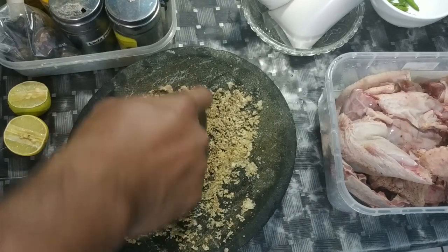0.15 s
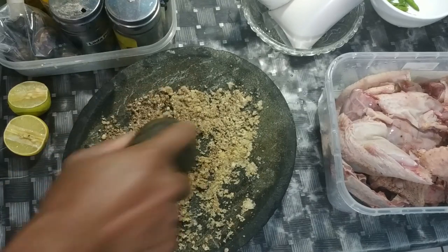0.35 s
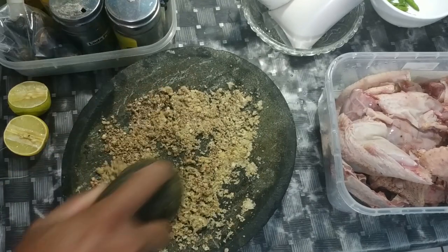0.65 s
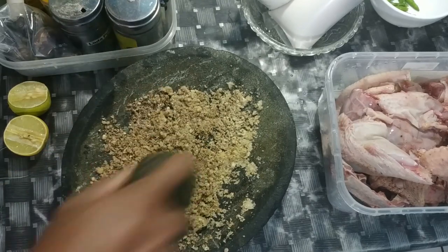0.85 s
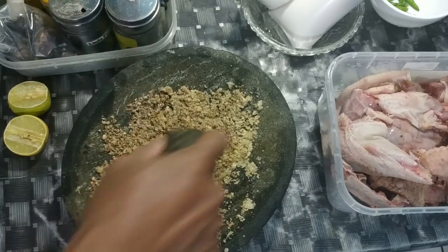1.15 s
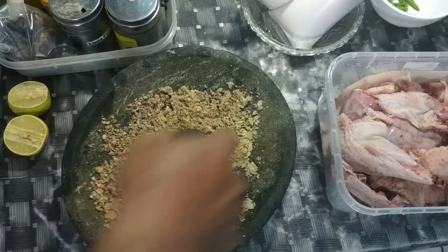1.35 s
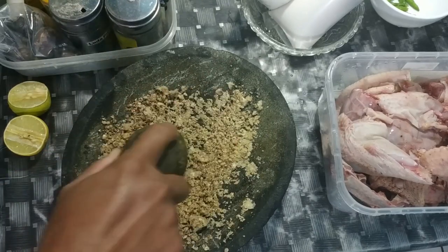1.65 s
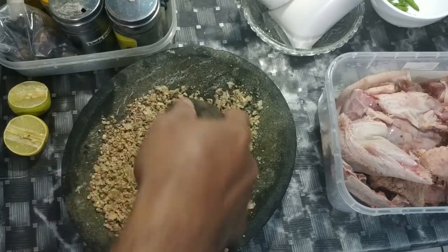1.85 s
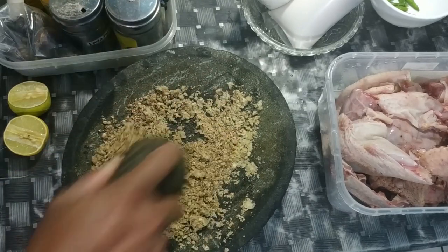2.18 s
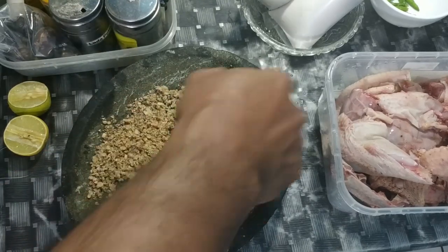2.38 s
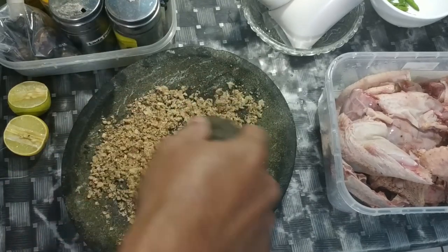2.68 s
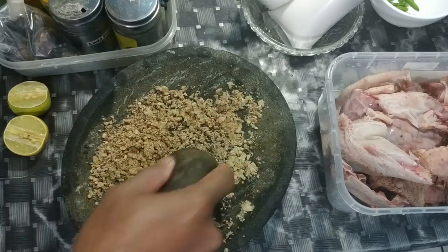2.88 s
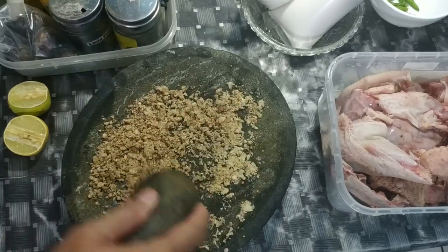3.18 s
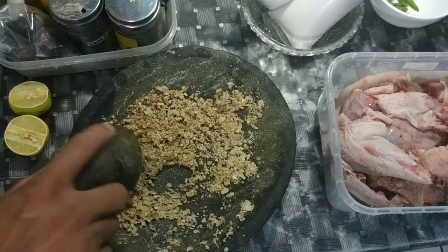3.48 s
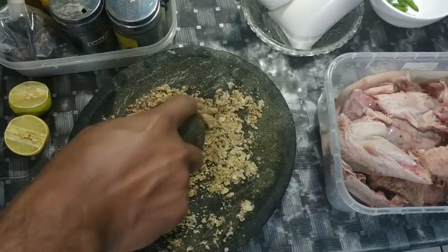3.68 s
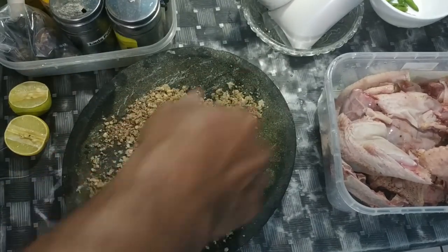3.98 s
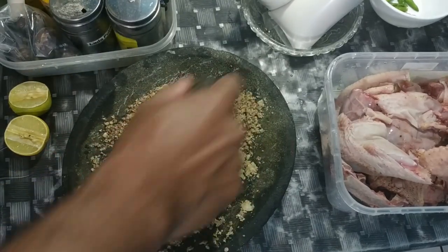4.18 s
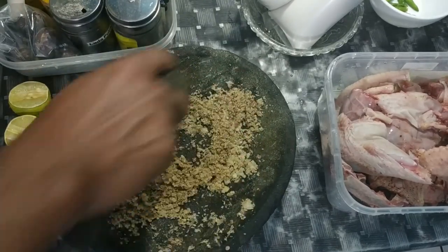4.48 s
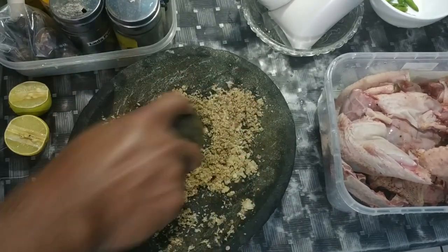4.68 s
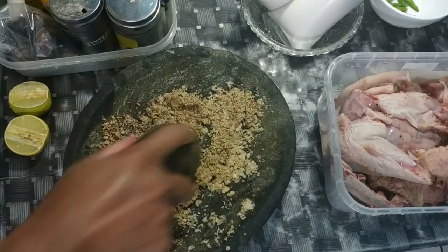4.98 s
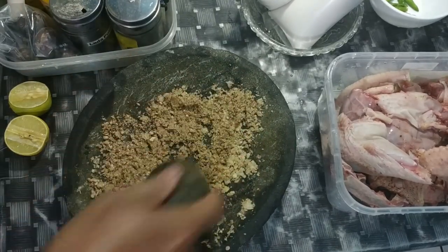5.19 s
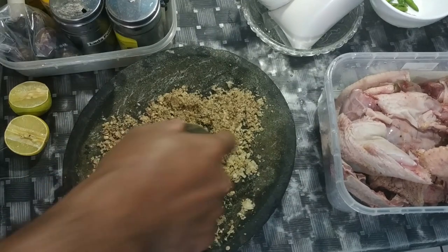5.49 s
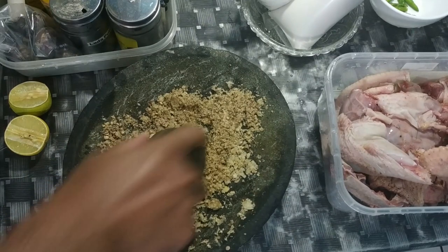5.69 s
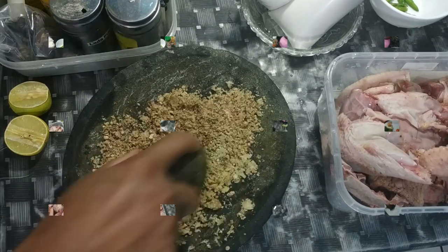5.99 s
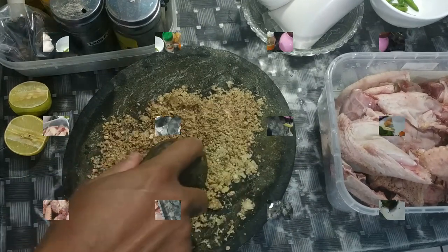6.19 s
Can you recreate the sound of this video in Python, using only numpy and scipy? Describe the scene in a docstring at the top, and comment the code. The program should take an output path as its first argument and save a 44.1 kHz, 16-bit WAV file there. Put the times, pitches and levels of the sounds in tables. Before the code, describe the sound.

A stone pestle grinds dry, hard spices on a stone mortar in gritty crunching strokes, with dull thumps and two loud stone clacks.

```python
"""On a kitchen table in a small, hard-walled room, a stone pestle crushes hard spices on a flat stone mortar.
Blows cushioned by spice thump and set the table ringing; bare stone clacks or skids and rings in decaying modes.
Random fractures merge to a hiss under each stroke; short bright bursts and faint narrow bands of noise add treble.
Behind them lie a steady rush of room air and a wavering hum; the recorder's limiter ducks the loudest knocks."""
import sys
import numpy as np
from scipy import signal
from scipy.fft import rfft, irfft
from scipy.io import wavfile
from scipy.ndimage import uniform_filter1d

SR = 44100
rng = np.random.default_rng(int(sys.argv[2]) if len(sys.argv) > 2 else 0)


def inscribe(sig):
    """Save sig as 16-bit PCM at rate SR to the path in sys.argv[1].

    A 1-D sig is mono; a 2-D sig holds one channel per row.
    Samples are clipped to [-1, 1] before scaling.
    """
    pcm = np.round(np.clip(np.atleast_2d(sig).T, -1, 1) * 32767)
    wavfile.write(sys.argv[1], SR, pcm.astype(np.int16))


N = 279990

# spectrum of a dull thud, for blows and the rumble of the drag: (frequency [Hz], relative level [dB])
THUD_SPECTRUM = [(30, -27), (70, -29.5), (110, -10.5), (150, -7), (185, 5.5), (260, 1.5), (360, 4),
                 (480, -3.5), (620, -7), (950, -4), (1500, -14.5), (4000, -4)]
# ringing modes of the stone mortar: (frequency [Hz], relative level [dB], t60 [s])
MORTAR_MODES = [(990, -27, .08), (1080, -30, 0.065), (1214, -11, 0.029), (1468, -16, 0.027),
                (1572, -19, 0.091), (1933, 13.5, 0.015), (2027, 8.5, 0.094), (2055, 2.5, 0.23),
                (2110, 10, 0.057), (2346, 13, 0.02)]


def thumps():
    """The pestle lands on spice and shoves the heavy mortar into the table, which rings."""
    # blows cushioned by spice:
    # (time [s], relative level [dB], brightness corner [Hz], time the seeds take to give way [s])
    blows = [(0.002, -25.5, 587, 0.0042), (0.624, -18, 590, 0.0084), (0.922, -19, 640, 0.0075),
             (0.936, -24, 920, 0.0016), (1.452, -11.5, 640, 0.006), (1.466, -17.5, 493, 0.0025),
             (2.054, -16, 570, 0.019), (2.105, -16.5, 670, 0.013), (2.143, -15, 850, 0.0079),
             (2.773, -9, 614, 0.0033), (3.132, -27, 428, 0.012), (3.486, -21.5, 450, 0.026),
             (4.437, -5, 730, 0.0045), (5.342, -9.5, 700, 0.01), (5.357, -17, 856, 0.01),
             (5.619, -16, 616, 0.0021), (5.64, -22, 800, 0.014)]
    # ringing modes of the loaded table: (frequency [Hz], relative level [dB], t60 [s])
    table_modes = [(119, -38, 0.045), (179.7, 0, 0.14), (219, -4, 0.031), (266, -33, 0.036),
                   (331.4, 5.5, 0.18), (340, -32, 0.044), (505.7, 8, 0.13)]
    out = np.zeros(N)
    t = np.arange(SR // 3) / SR
    for s, db, corner_hz, give_s in blows:
        force = contact(t, give_s, crumble=0.19)
        push = burst(colour(force, THUD_SPECTRUM, corner_hz))
        table = struck(table_modes, push)
        add(out, s, amp(db) * (push + amp(-3) * table))
    return amp(-1.5) * kitchen(out, wet_db=0.0, build_s=0.002, length=0.8)


def clacks():
    """Bare stone hits or skids on stone: a click or chatter sets the mortar ringing, and a hit the pestle too."""
    # bare stone striking stone: (time [s], relative click level [dB], relative mortar ring level [dB],
    # relative pestle ring level [dB], brightness corner [Hz])
    hits = [(1.451, -32, -40, -33, 3500), (2.0476, -30.5, -33, -32, 6000), (2.7696, -6.5, -3.5, -30, 2680),
            (2.7706, -24, -34, -41, 3260), (3.0415, -31, -26.5, -31, 3520), (4.433, -3.5, -9.5, -17, 4200),
            (5.254, -35.5, -34, -64, 3000)]
    # pestle skidding over bare stone:
    # (time [s], relative scrape level [dB], relative mortar ring level [dB])
    skids = [(0.003, -47, -34), (0.56, -40, -32), (0.9, -29.5, -40), (2.09, -29.5, -26), (3.52, -26.5, -27),
             (5.306, -26.5, -27.5)]
    # spectrum of stone on stone: (frequency [Hz], relative level [dB])
    click_spectrum = [(60, -59), (120, -26), (200, -75), (500, -2), (900, 8.5), (1400, 5), (2000, 3),
                      (2700, -9), (4300, -9), (5500, -64), (16000, -50)]
    # ringing modes of the pestle: (frequency [Hz], relative level [dB], t60 [s])
    pestle_modes = [(2810, 0, 0.028), (3410, -1.5, 0.061), (4244, 0.5, 0.075), (4326, 5, 0.029)]
    hit_give_s = 0.000025  # stone hardly yields
    skid_s, skid_corner_hz = 0.026, 2220  # decay time of the chatter, and its brightness
    ring_pan_db = 2.4  # the rings are raised in the left channel and lowered in the right

    clicks, rings = np.zeros(N), np.zeros(N)
    t = np.arange(SR // 2) / SR
    for s, click_db, mortar_db, pestle_db, corner_hz in hits:
        force = contact(t, hit_give_s, crumble=0.54)
        click = burst(colour(force, click_spectrum, corner_hz))
        add(clicks, s, amp(click_db) * click)
        mortar = amp(mortar_db) * struck(MORTAR_MODES, click)
        pestle = amp(pestle_db) * struck(pestle_modes, click)
        add(rings, s, mortar + pestle)
    for s, scrape_db, mortar_db in skids:
        force = contact(t, skid_s, crumble=0.25)
        chatter = burst(colour(force, click_spectrum, skid_corner_hz))
        add(clicks, s, amp(scrape_db) * chatter)
        add(rings, s, amp(mortar_db) * struck(MORTAR_MODES, chatter))

    # the ringing reaches the right channel 6 samples after the left
    panned = np.array([rings, np.roll(rings, 6)]) * amp([[ring_pan_db], [-ring_pan_db]])
    click_sound = kitchen(clicks, wet_db=0.0, build_s=0.00022, length=1.0)
    ring_sound = kitchen(panned, wet_db=-2.0, build_s=0.0029, length=1.06)
    return amp(-4.5) * (click_sound + ring_sound)


def grinding():
    """Countless tiny fractures merge to a hiss under the moving pestle; the drag also shakes stone and table."""
    # spectrum of fine grit being crushed: (frequency [Hz], relative level [dB])
    crush_spectrum = [(100, -36), (600, 3.5), (1500, -4), (3000, -8.5), (4500, -1.5), (6000, 0.5),
                      (8500, 0.5), (12000, -2), (16000, -5.5)]
    # spectrum of stone rasping over coarse grit: (frequency [Hz], relative level [dB])
    rasp_spectrum = [(100, -14), (500, -1), (1000, -2.5), (1600, -3.5), (2100, -4), (2600, -0.5),
                     (3600, -2), (5000, -8), (8000, -19), (16000, -12)]
    crush, rasp, drag = pressure()
    grip = flutter(depth_db=0.9, rate_hz=45)  # the pestle catches and slips

    fine_pair = (colour(grains(per_s=14000, spread_db=-1.25), crush_spectrum) for k in range(2))
    fine = crush * evened(stereo(*fine_pair))
    coarse_pair = (colour(grains(per_s=9000, spread_db=2.4), rasp_spectrum) for k in range(2))
    coarse = rasp * evened(stereo(*coarse_pair))
    # the grit also excites the mortar's own modes
    singing = rasp * evened(struck(MORTAR_MODES, grains(per_s=7800, spread_db=2)))
    rumble = drag * evened(colour(grains(per_s=500, spread_db=-4.0), THUD_SPECTRUM, corner_hz=426))

    grit = shifting(grip * (amp(2.0) * fine + amp(0.5) * coarse), depth_db=2.5)
    mix = grit + amp(-15) * singing + amp(3.0) * rumble
    return kitchen(mix, wet_db=-3.0, build_s=0.00063, length=0.58)


def pressure():
    """Gains of crushing, rasping and dragging: strokes bite, swell and release, and overlap in power."""
    # strokes of the pestle: (time [s], time pressed [s], relative level of fine grit being crushed [dB],
    # relative level of stone rasping over coarse grit [dB], relative level of the drag shaking the table [dB])
    strokes = [(-0.03, 0.033, -35, -42.5, -36), (0.039, 0.13, -47.5, -43.5, -55),
               (0.2, 0.079, -43.5, -51.5, -45), (0.571, 0.091, -36.5, -41, -36.5),
               (0.782, 0.054, -42, -50, -50), (0.895, 0.083, -37, -41, -32.5),
               (1.054, .079, -48.5, -61, -57), (1.167, 0.094, -49.5, -54, -41), (1.375, 0.1, -51, -42, -40),
               (1.463, 0.11, -37, -41, -42.5), (1.633, 0.08, -39.5, -40.5, -34),
               (2.072, 0.1, -35.5, -37, -36.5), (2.27, .25, -54, -41, -70),
               (2.418, .128, -33.5, -43.5, -34.5), (2.792, 0.03, -37, -41, -24),
               (3.008, 0.05, -46.5, -39.5, -35), (3.097, 0.087, -40, -41.5, -42),
               (3.171, 0.19, -50, -43.5, -47), (3.401, .09, -43.5, -48, -44.5),
               (3.5, 0.12, -40.5, -45, -35.5), (3.715, 0.047, -44, -45.5, -41),
               (3.847, 0.042, -41.5, -38, -33), (4.024, 0.17, -43.5, -40, -59),
               (4.11, 0.15, -42.5, -51, -48.5), (4.439, 0.062, -35.5, -41, -53),
               (4.599, 0.062, -41.5, -44, -35), (4.763, 0.098, -47.5, -47.5, -45.5),
               (4.878, 0.063, -45, -45, -36.5), (5.14, 0.19, -58, -52.5, -52),
               (5.27, 0.12, -37.5, -39.5, -32), (5.494, 0.09, -45.5, -41.5, -49),
               (5.589, 0.085, -42.5, -43, -33.5), (5.714, 0.19, -49, -54, -44),
               (5.871, 0.056, -40, -42, -37.5)]
    rest_db = -54.5  # light rubbing that goes on between strokes, before the mix gains
    bite_s, lean_db, release_db_per_s = 0.055, 1, 154
    power = np.full((3, N), amp(rest_db) ** 2)
    t = np.arange(N) / SR
    for s, press_s, *levels_db in strokes:
        near = (t > s) & (t < s + 1)
        age = t[near] - s
        bite = np.sin(np.pi / 2 * np.minimum(age / bite_s, 1)) ** 2
        # the level swells as the hand leans on the stroke
        swell = np.sin(np.pi * np.minimum(age / press_s, 1) ** 2) - .5
        lean = amp(lean_db * swell)
        # it dies away as the hand eases off
        release = amp(-release_db_per_s * np.maximum(age - press_s, 0))
        power[:, near] += np.outer(amp(levels_db), bite * lean * release) ** 2
    return np.sqrt(power)


def grains(per_s, spread_db):
    """Random fractures of uneven size; a positive spread gives a few large ones among many small."""
    size = amp(spread_db * np.minimum(rng.exponential(1, N), 5))
    return size * rng.standard_normal(N) * (rng.random(N) < per_s / SR)


def shifting(x, depth_db):
    """The colour of the grit drifts in patches as different seeds come under the stone."""
    z = signal.stft(x, nperseg=512)[2]
    patches = rng.standard_normal(z.shape[1:])
    for axis in (0, 1):  # smooth over frequency, then time
        patches = uniform_filter1d(patches, size=6, axis=axis)
    return signal.istft(z * amp(depth_db * evened(patches)), nperseg=512)[1][:, :N]


def bright_bursts():
    """Short, dry, bright bursts, most of them at the onset of a stone clack: a push and fading jolts."""
    # bright bursts: (time [s], level [dB])
    onsets = [(0.0225, -59), (1.2767, -44.5), (2.047, -38.5), (2.769, -42), (4.4341, -26.5)]
    # spectrum of a bright burst: (frequency [Hz], relative level [dB])
    bright_spectrum = [(100, 5), (2500, 6.5), (4000, 5), (10000, -4), (16000, -10)]
    out = np.zeros(N)
    t = np.arange(1000) / SR
    for s, db in onsets:
        force = contact(t, give_s=0.0084, crumble=0.13)
        add(out, s, amp(db) * burst(colour(force, bright_spectrum)))
    return out


def high_hisses():
    """Faint narrow bands of very high hiss, cut from noise, swell and fade."""
    # hisses: (time [s], length [s], centre [Hz], width [Hz], relative level [dB])
    hisses = [(0.317, 0.22, 12200, 1500, -49), (0.451, 0.19, 12600, 1600, -46.5),
              (1.169, 0.18, 10550, 420, -48), (5.147, 0.11, 8850, 1200, -49.5),
              (5.98, 0.16, 12400, 900, -50)]
    out = np.zeros((2, N))
    for s, length_s, hz, width_hz, db in hisses:
        n = round(length_s * SR)
        noise = rng.standard_normal((2, N))[:, :n]
        band = np.exp(-2 * ((np.fft.rfftfreq(n, 1 / SR) - hz) / width_hz) ** 2)
        hiss = evened(irfft(rfft(noise) * band, n))
        add(out, s, amp(db) * hiss * np.hanning(n))
    return amp(0.5) * out


def room_air():
    """Steady low rush of the room, as filtered noise, with a faint sine hum wavering in pitch and level."""
    # spectrum of the rush: (frequency [Hz], relative level [dB])
    air_spectrum = [(25, -27), (50, -28), (80, -21), (120, -12.5), (180, 4), (240, 1.5), (330, -0.5),
                    (450, -5), (700, -11.5), (1300, -16.5), (2500, -23.5), (6000, -51.5), (16000, -49)]
    rush = evened(stereo(*(colour(z, air_spectrum) for z in rng.standard_normal((2, N)))))
    hum_hz = 184 * flutter(depth_db=.15, rate_hz=8)
    hum = np.sin(2 * np.pi * np.cumsum(hum_hz) / SR)
    hum *= flutter(depth_db=6.5, rate_hz=22.0)
    return amp(-41.5) * rush + amp(-51.5) * hum


def kitchen(x, wet_db, build_s=.004, length=1.):
    """Direct sound plus dense reflections that die band by band and shift as the hand moves."""
    # reverberation, which length stretches or shortens: (frequency [Hz], t60 at length 1 [s])
    decay_times = [(150, 0.58), (350, 0.53), (800, 0.39), (2000, 0.4), (5000, 0.45), (14000, 0.27)]
    x, wet = np.atleast_2d(x), np.zeros((2, N))
    for k in range(3):
        noise = stereo(*rng.standard_normal((2, SR // 2)))
        hz, t, z = signal.stft(noise, SR, nperseg=256)
        t60 = length * read(decay_times, hz)[:, None]
        tail = signal.istft(z * amp(-60 * t / t60), SR, nperseg=256)[1]
        tail *= (1 - np.exp(-np.arange(tail.shape[1]) / SR / build_s)) ** 2
        tail /= np.linalg.norm(tail[0])
        # the three tails trade places at constant total power
        share = np.cos(np.pi * (np.arange(N) / SR + k / 3)) * np.sqrt(2 / 3)
        wet += signal.oaconvolve(x * share, tail, axes=1)[:, :N]
    return (x + amp(wet_db) * wet) / np.hypot(1, amp(wet_db))


def stereo(mid, side):
    """Left and right of a diffuse sound: alike in the bass, largely unrelated in the treble."""
    # side against mid in the room: (frequency [Hz], level [dB])
    side_width = [(60, -16), (150, -15.5), (280, -8), (500, -5.5), (1000, 0.5), (2000, 0.5), (4000, 2.5),
                  (16000, -0.5)]
    hz = np.fft.rfftfreq(len(side), 1 / SR)
    side = irfft(rfft(side) * amp(read(side_width, hz)), len(side))
    return np.array([mid + side, mid - side])


def contact(t, give_s, crumble):
    """Force of a blow: one push, then jolts that swell and fade as the contact gives way."""
    fade = np.exp(-t / give_s)
    force = crumble * rng.standard_normal(len(t)) * fade * (1 - fade ** 2)
    force[0] += 1
    return force


def struck(modes, force):
    """What an object rings with under a force, scaled as a burst."""
    ringing = ring(modes, np.arange(len(force)) / SR)
    return burst(signal.fftconvolve(force, ringing)[:len(force)])


def ring(modes, t):
    """Sum of dying sine modes, which start upward and downward by turns."""
    total = 0
    for k, (hz, db, t60) in enumerate(modes):
        total = total + (-1) ** k * amp(db - 60 * t / t60) * np.sin(2 * np.pi * hz * t)
    return total


def colour(x, points, corner_hz=np.inf):
    """Causal (minimum-phase) filter with the given spectrum, dulled by a soft contact."""
    hz = abs(np.fft.fftfreq(4096, 1 / SR))
    log_gain = np.log(amp(read(points, hz)) * softness(hz, corner_hz))
    taps = np.fft.ifft(np.exp(np.conj(signal.hilbert(log_gain)))).real
    return signal.oaconvolve(x, taps)[:len(x)]


def softness(hz, corner_hz):
    """A contact of finite length hardly shakes what lies above its corner."""
    return 1 / np.hypot(1, (hz / corner_hz) ** 3)


def flutter(depth_db, rate_hz):
    """A gain that wanders at random, with an rms depth in dB and little motion above the rate."""
    lowpass = 1 / (1 + (np.fft.rfftfreq(N, 1 / SR) / rate_hz) ** 4)
    slow = irfft(rfft(rng.standard_normal(N)) * lowpass, N)
    return amp(depth_db * evened(slow))


def amp(db):
    """Decibels to gain."""
    return 10 ** (np.asarray(db) / 20)


def evened(x):
    """Scales to an rms of one."""
    return x / np.sqrt(np.mean(x ** 2) + 1e-20)


def burst(x):
    """Scales a short sound to the energy of 10 ms at an rms of one."""
    return x * np.sqrt(SR / 100 / (np.sum(x ** 2) + 1e-20))


def read(points, hz):
    """Reads a spectrum or decay curve on a logarithmic frequency axis."""
    f, value = np.transpose(points)
    return np.interp(np.log(hz + 1), np.log(f + 1), value)


def add(mix, s, sound):
    """Mixes a sound in at time s [s]."""
    part = mix[..., max(round(s * SR), 0):][..., :sound.shape[-1]]
    part += sound[..., :part.shape[-1]]


def scene():
    """Blows, grinding, bright bursts and high hisses over the room air."""
    return thumps() + clacks() + bright_bursts() + grinding() + high_hisses() + room_air()


def record(dry, threshold_db=-16, recovery_db_per_s=100, squeeze=0.92, low_cut_hz=65):
    """The microphone sheds deep bass; a limiter ducks the hardest knocks and recovers; then the band limit."""
    dry = signal.sosfilt(signal.butter(2, low_cut_hz, "high", fs=SR, output="sos"), dry)
    power = uniform_filter1d((dry ** 2).mean(0), size=200)
    power_db = 10 * np.log10(abs(power) + 1e-12)
    # hold each peak and let it fall at the recovery rate
    fall = np.arange(N) * recovery_db_per_s / SR
    held_db = np.maximum.accumulate(power_db + fall) - fall
    over_db = np.maximum(held_db - threshold_db, 0)
    lag = np.exp(-1 / (0.002 * SR))  # 2 ms lag: the first crack slips through
    duck_db = squeeze * signal.lfilter([1 - lag], [1, -lag], over_db)
    ducked = dry / amp(duck_db)
    edge = signal.firwin(511, 15950, window=("kaiser", 9), fs=SR)  # low-pass, cutoff in Hz
    return signal.oaconvolve(np.clip(ducked, -1, 1), edge[None], "same")


dry = scene()
out = record(dry)
inscribe(out)
```